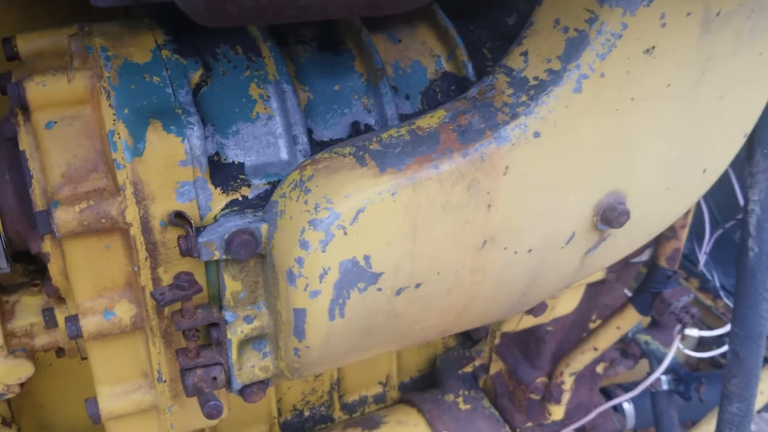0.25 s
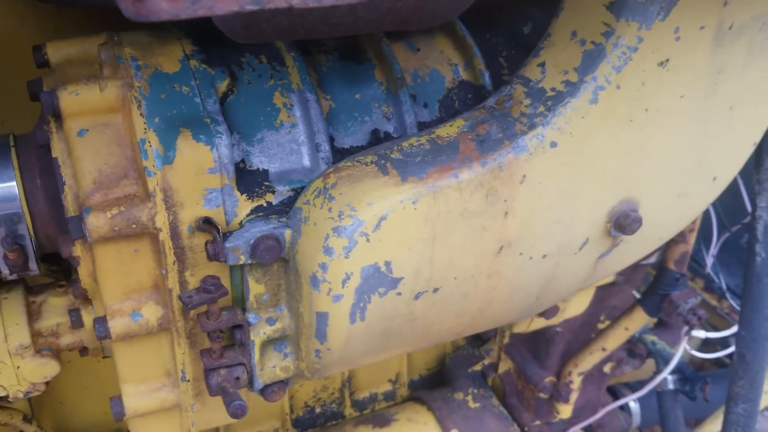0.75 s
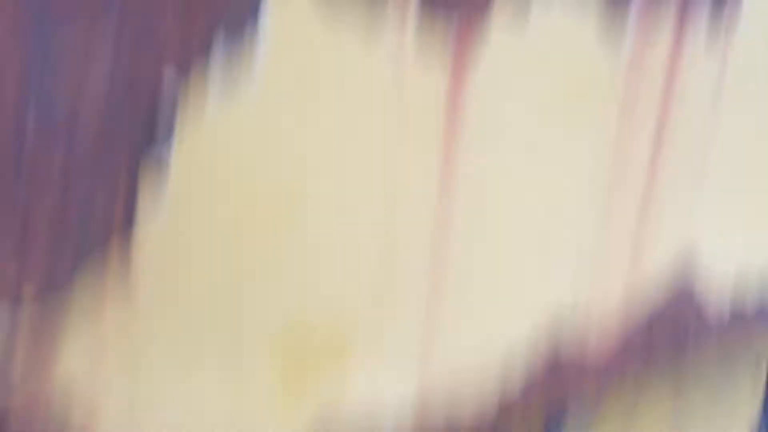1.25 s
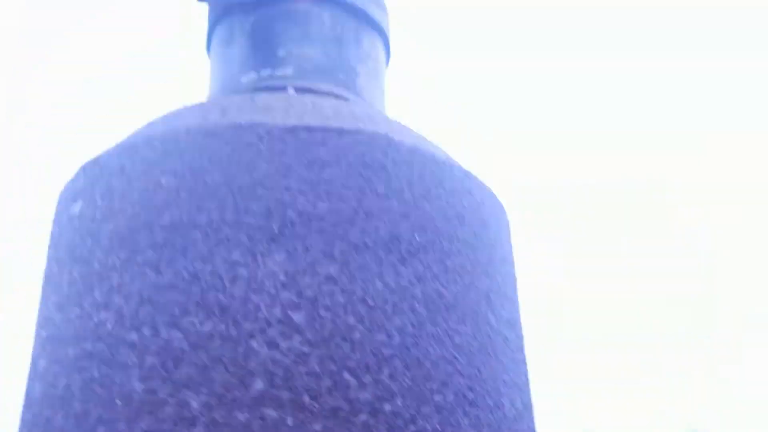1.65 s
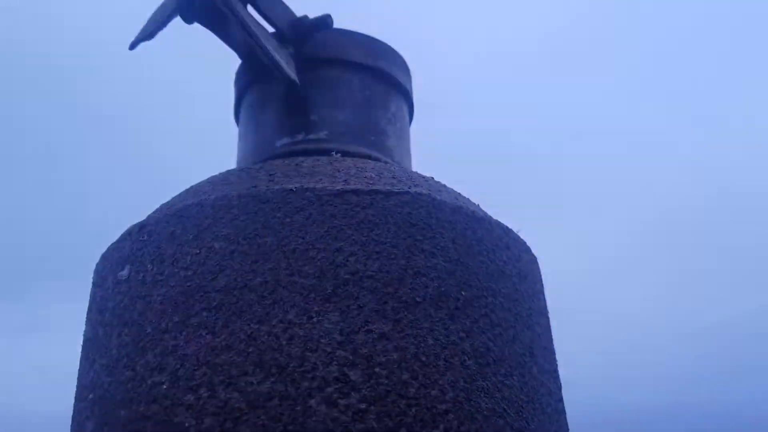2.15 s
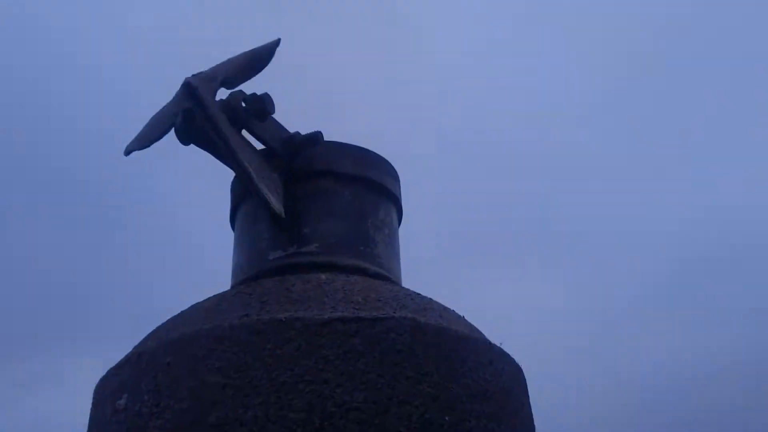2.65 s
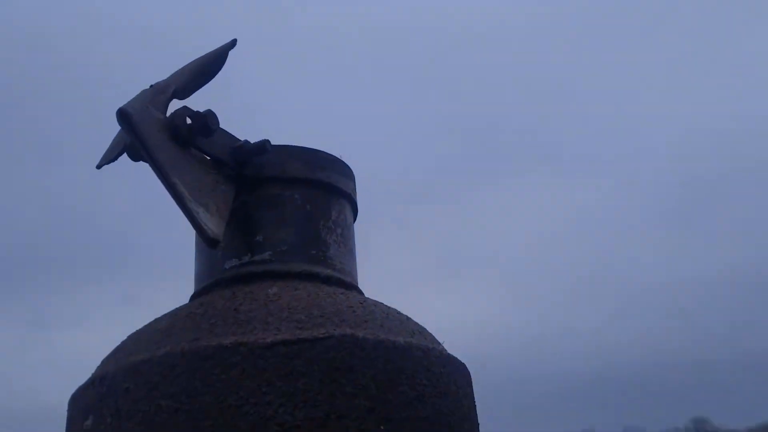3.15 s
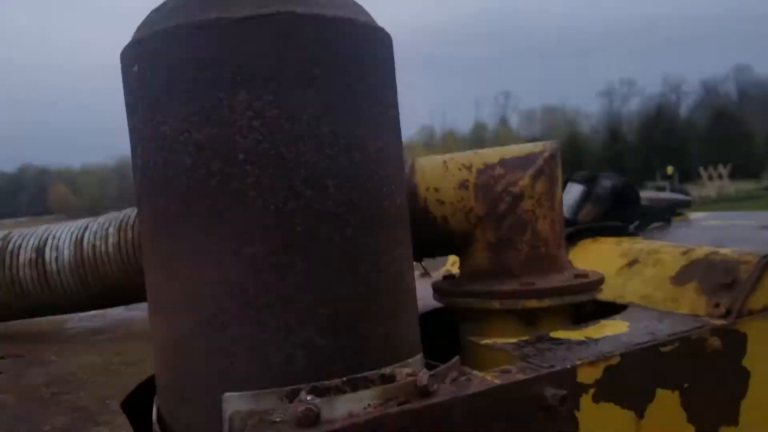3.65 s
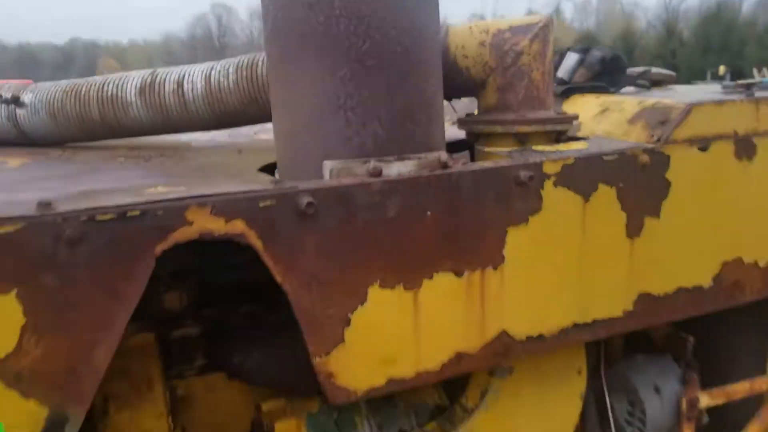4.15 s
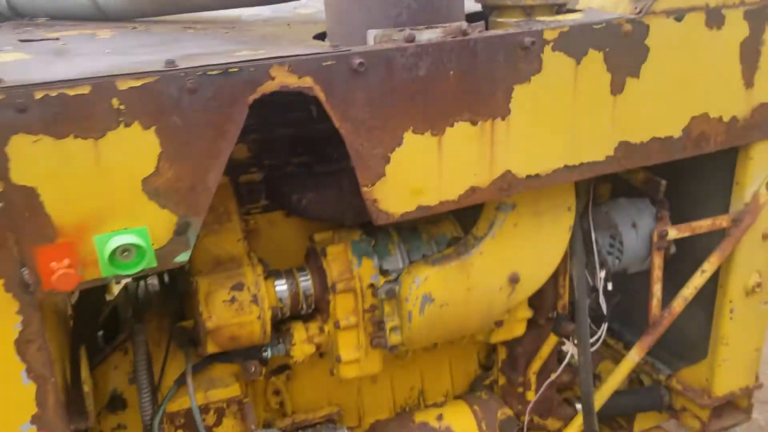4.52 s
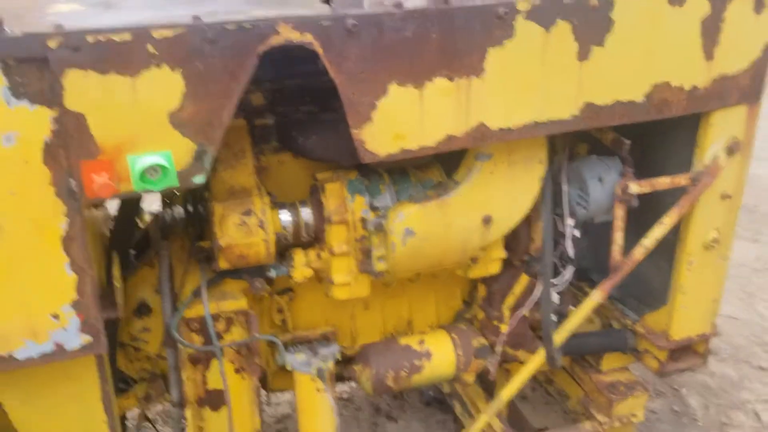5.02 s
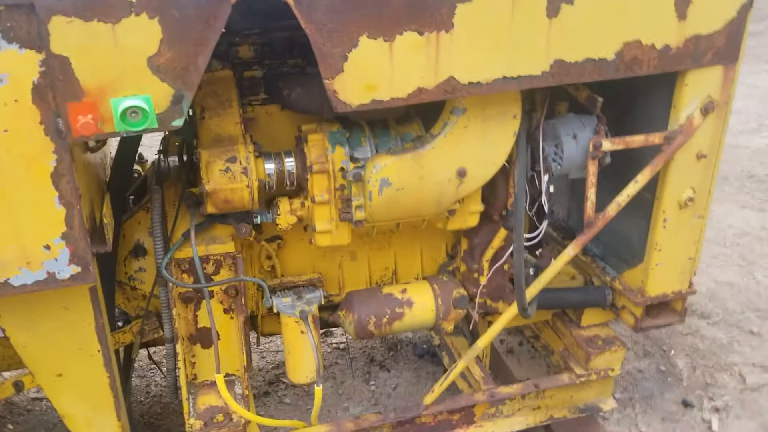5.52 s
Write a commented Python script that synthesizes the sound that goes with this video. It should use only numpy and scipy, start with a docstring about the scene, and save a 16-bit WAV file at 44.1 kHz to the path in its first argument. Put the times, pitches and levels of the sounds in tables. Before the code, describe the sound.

An old four-cylinder two-stroke diesel runs outdoors, heard in close, dry stereo. At 0 s it is already slowing from a fast rev: a buzzing exhaust drone and high gear whine glide down over dense metallic rattle beside the blower. From about 1.1 to 1.7 s the microphone moves to the exhaust stack; the whine recedes, and the low boom and a thin steady hiss come forward. At 1.8 s the throttle opens; pitch climbs to a peak near 2.5 s, with coarse, pulsing gas rasp and a breathy high whistle. Then the throttle closes, the rasp vanishes by 2.5 s, and the pitch slides down with softer clatter and gear whine. Between 3.6 and 4.7 s the microphone steps back. The hiss fades, and idle settles into a quick, loping beat of about fifty firings per second, with uneven knocks, slaps, ticks and panel rattle, until nearly 6 s.

```python
"""Outdoors, an old four-cylinder two-stroke diesel runs down to idle, is blipped once and settles again.
The microphone moves from beside the blower up to the exhaust stack, then steps back from the engine.
The stack booms in harmonics of the firing rate; noise struck once per firing knocks, slaps and ticks.
Blower and timing gears whine in step with the crank; under throttle, puffs of noise rasp and whistle."""
import sys
import numpy as np
from scipy import signal
from scipy.fft import rfft, irfft, next_fast_len
from scipy.io import wavfile
from scipy.ndimage import map_coordinates

SR = 44100
rng = np.random.default_rng(int(sys.argv[2]) if len(sys.argv) > 2 else 0)


def dump_mix(stems):
    """Bounce the given channels to the path in sys.argv[1] as a 16-bit WAV at rate SR."""
    frames = np.atleast_2d(stems).T  # one column per channel
    limited = np.clip(frames, -1, 1)  # hard clip at full scale
    pcm = np.round(limited * 32767).astype(np.int16)
    wavfile.write(sys.argv[1], SR, pcm)


N = 254889
T = np.arange(N) / SR
IDLE_HZ = 47  # firings per second at which the speed-dependent levels are stated


def undb(db):
    """Decibels to gain."""
    return 10 ** (np.asarray(db) / 20)


def unit(x):
    """Scale to rms 1."""
    return x / np.sqrt(np.mean(x ** 2))


def level_curve(table):
    """Gain, sample by sample, from a table of times and levels joined by straight lines in dB."""
    seconds, db = np.transpose(table)
    return undb(np.interp(T, seconds, db))


def colour(x, points):
    """Filter by (frequency [Hz], level [dB]) points joined on a log frequency axis."""
    size = next_fast_len(N + 4096, real=True)
    hz, db = np.transpose(points)
    freq = np.maximum(np.fft.rfftfreq(size, 1 / SR), 1)
    gain = undb(np.interp(np.log(freq), np.log(hz), db))
    return irfft(rfft(x, size) * gain, size)[..., :N]


def butter(x, hz, kind):
    """Second-order low- or high-pass."""
    return signal.sosfilt(signal.butter(2, hz, kind, fs=SR, output="sos"), x)


def ring(x, hz, width_hz):
    """One resonance, gain 1 at its centre."""
    return signal.lfilter(*signal.iirpeak(hz, hz / width_hz, fs=SR), x)


def noise():
    """Two unrelated white noises: mid and side."""
    return rng.standard_normal((2, N))


def wander(rate_hz):
    """Two smooth random signals of rms 1."""
    return unit(butter(noise(), rate_hz, "low"))


def breathy_tone(hz, width_hz):
    """A narrow band of noise around a moving pitch."""
    angle = 2 * np.pi * np.cumsum(hz) / SR
    return wander(width_hz / 2) * np.cos(angle) + wander(width_hz / 2) * np.sin(angle)


def late(x, seconds):
    """Delay by a fixed or moving time."""
    return map_coordinates(x, [(T - seconds) * SR], order=3, mode="nearest")


def throttle_envelope(attack_s, release_s):
    """The blip as attack, hold and release, 0 to 1."""
    press_s, let_go_s = 1.822, 2.4312
    rise = (T - press_s) / attack_s
    fall = 1 - (T - let_go_s) / release_s
    return np.clip(np.minimum(rise, fall), 0, 1)


def engine_speed():
    """Firings per second: torque and a sluggish governor pull, friction drags towards a floor."""
    start_hz, coast_floor_hz, coast_s = 87.1, 41.42, .6856
    pull_hz_per_s = 134.96  # at full throttle
    governor_hz, governor_share_per_hz, governor_lag_s = 47.58, .164, .678
    step_s = .01
    times = np.arange(0, T[-1] + step_s, step_s)
    torques = np.interp(times, T, throttle_envelope(attack_s=.5046, release_s=.3767))
    hz, fuel, speeds = start_hz, 0, []
    for torque in torques:
        speeds.append(hz)
        wanted_fuel = governor_share_per_hz * max(governor_hz - hz, 0)
        fuel += step_s * (wanted_fuel - fuel) / governor_lag_s
        hz += step_s * (pull_hz_per_s * (torque + fuel) - (hz - coast_floor_hz) / coast_s)
    return np.interp(T, times, speeds)


def coasting(hz):
    """How far the engine runs down without fuel, 0 to 1, judged by how fast it slows."""
    full_coast_hz_per_s = 16
    return np.clip(-np.gradient(hz) * SR / full_coast_hz_per_s, 0, 1)


def octaves_above_idle(hz):
    """Engine speed in octaves above idle."""
    return np.log2(hz / IDLE_HZ)


def by_speed(hz, db_per_octave, coasting_db):
    """Change of level in dB with speed and with coasting."""
    return db_per_octave * octaves_above_idle(hz) + coasting_db * coasting(hz)


def standpoint_shares():
    """How much of each standpoint is heard as the microphone moves: blower, stack, stepped back."""
    left_blower = np.interp(T, [1.1, 1.74], [0, 1])
    stepped_back = np.interp(T, [3.64, 4.66], [0, 1])
    return np.array([1 - left_blower, left_blower - stepped_back, stepped_back])


def blows(firings, angle, cylinder_db, decay_s):
    """Envelope of one blow per firing at a given share of its interval; cylinders differ in strength."""
    count = np.floor(firings - angle).astype(int) + 4  # +4 keeps the index positive
    age_s = T - T[np.searchsorted(count, count)]
    scatter_db = 1.1 * rng.standard_normal(count.max() + 1)
    return undb(cylinder_db[count % 4] + scatter_db[count]) * np.exp(-age_s / decay_s)


def rattle(firings, alike):
    """Dense metal contacts as noise of which a share repeats on every turn of the crank."""
    count = np.floor(firings).astype(int)
    age = np.arange(N) - np.searchsorted(count, count)  # samples since the firing
    pattern = rng.standard_normal((2, 4, 2048))
    return np.sqrt(alike) * pattern[:, count % 4, age] + np.sqrt(1 - alike) * noise()


# The four cylinders in firing order: (exhaust strength [dB], combustion knock [dB],
# piston slap [dB], injector tick [dB])
CYLINDER_STRENGTHS = [(-.8, -3, -4, -3), (.6, -3, 3, -1), (2.2, 5, 0, 0), (-1.6, -4, -10, 3)]
# What the muffler passes: (frequency [Hz], level [dB])
MUFFLER_RESPONSE = [(46, -24), (62, -8), (72, 0.5), (94, 0.5), (122, 2.5), (152, 4.5), (168, -1.5),
                    (186, -6), (215, -19.5), (276, -4)]
# Overall level of the three lowest exhaust harmonics: (time [s], level [dB])
BOOM_LEVELS = [(0.03, -13.5), (0.27, -11), (0.81, -13), (1.19, -9), (1.91, -7), (2.25, -10.5), (2.53, -8.5),
               (2.79, -15), (3.64, -14.5), (3.94, -11), (5.26, -12), (5.72, -12)]


def muffled_boom(firings, hz, throttle, third_db):
    """The muffler shapes the three lowest exhaust harmonics; unequal cylinders make them lope."""
    strength_db = signal.resample(np.array(CYLINDER_STRENGTHS)[:, 0], 64)  # smooth over one turn
    lope_db = np.interp(firings / 4 % 1, np.arange(64) / 64, strength_db, period=1)
    # the lope is deeper at low speed, and deepens once more late on
    lope_depth = np.interp(T, [3.9, 4.6], [.3, .9]) * IDLE_HZ / hz
    muffler_hz, muffler_db = np.transpose(MUFFLER_RESPONSE)
    muffling = 1 - .34 * throttle  # the blast partly overrides the muffler
    gains = []
    for k, extra_db in enumerate((0, 0, third_db), 1):
        passed_db = np.interp(np.log(k * hz), np.log(muffler_hz), muffler_db)
        gains.append(undb(passed_db * muffling + extra_db))
    gains = np.array(gains)
    gains = gains / np.linalg.norm(gains, axis=0) * level_curve(BOOM_LEVELS)
    angle = 2 * np.pi * (firings - .04)
    # the lowest tones are advanced most in phase
    low = sum(gain * np.cos(k * angle + 1.4 / k ** 2) for k, gain in enumerate(gains, 1))
    return low * undb(lope_db * lope_depth + .075 * wander(37)[0])


# Resonances of the exhaust system: (frequency [Hz], width [Hz], level [dB])
PIPE_RESONANCES = [(180.7, 13.4, -35.5), (223.6, 28, -40), (405, 25, -36.5), (565, 13, -39)]


def pipe_tones(firings, throttle):
    """Uneven harmonics 4 to 7 swell through the pipe resonances; throttle sharpens the pulses."""
    angle = 2 * np.pi * (firings - .04)
    uneven = 1 + .55 * np.cos(angle / 4) + .38 * wander(17)[0]
    upper = sum(np.cos(k * angle) for k in range(4, 8)) * uneven
    pipe = sum(undb(db) * ring(upper, centre, width) for centre, width, db in PIPE_RESONANCES)
    edge = undb(-42) * throttle * upper
    return pipe + edge


def exhaust_boom(firings, hz, throttle, third_db):
    """The stack's whole pitched voice: muffled boom and pipe tones."""
    voice = muffled_boom(firings, hz, throttle, third_db) + pipe_tones(firings, throttle)
    return np.sqrt(2) * voice


# Colour of the machinery beside the blower: (frequency [Hz], level [dB])
BLOWER_COLOUR = [(150, -46), (260, -9), (336, -10), (420, 0), (542, -12), (640, -18.5), (764, -14.5),
                 (1020, -9), (1390, -23), (1990, -17.5), (2530, -24.5), (3950, -28.5), (5000, -35),
                 (7300, -40.5), (15500, -43.5)]
# Colour of the machinery by the stack: (frequency [Hz], level [dB])
STACK_COLOUR = [(150, 2), (260, -8.5), (413, 3), (561, -4), (777, -8.5), (1000, -4.5), (1280, -16),
                (1800, -18.5), (2490, -19), (3050, -25), (4080, -26), (5010, -29.5), (8230, -38.5),
                (12000, -34.5), (15500, -39)]
# Colour of the machinery stepped back from the engine: (frequency [Hz], level [dB])
STEPPED_BACK_COLOUR = [(150, -40), (260, -1.5), (400, 6), (500, -6.5), (601, 4.5), (700, -7.5), (987, 4.5),
                       (1150, -7), (1450, -10), (1900, -10), (2660, -17), (4220, -18.5), (4840, -24),
                       (9600, -32), (15500, -36)]


def clatter(firings, knock, tick, clatter_db):
    """Knocks and injector ticks over a steady rattle, coloured by where the listener stands."""
    steady = rattle(firings, alike=.82)
    knocks = rattle(firings, alike=.7) * knock
    body = butter(.91 * steady + 1.03 * knocks, 2850, "low")
    top = butter(.87 * noise() + .21 * knocks + 1.37 * noise() * tick, 2430, "high")
    top = top * undb(.9 * wander(8.7)[0])  # the treble flickers
    places = (BLOWER_COLOUR, STACK_COLOUR, STEPPED_BACK_COLOUR)
    heard = sum(share * unit(colour(body + top, place))
                for share, place in zip(standpoint_shares(), places))
    return heard * undb(clatter_db + .5 * wander(9)[0])


def contact(firings, blow):
    """A blow as one hard impact and a short rattle."""
    impact = unit(np.maximum(np.diff(blow, prepend=blow[0]), 0))
    impact_mid_only = np.array([impact, np.zeros(N)])
    return unit(rattle(firings, alike=.7) * blow) + .77 * impact_mid_only


# Ringing panels: (struck by [blow name], frequency [Hz], width [Hz], level beside the blower [dB],
# level by the stack [dB], level stepped back [dB])
PANEL_MODES = [("slap", 778, 97, -42, -59, -36), ("slap", 1015, 37, -61, -30.5, -41),
               ("knock", 1700, 270, -60, -39, -57.5), ("knock", 2370, 1200, -58, -48.5, -72),
               ("knock", 4080, 76, -41, -58, -48)]


def panels(firings, hz, knock, slap):
    """Sheet metal resonances struck by knock or slap; without fuel only speed shakes them."""
    struck = {"knock": knock, "slap": slap}
    shares = standpoint_shares()
    ringing = 0
    for blow, centre, width, *place_db in PANEL_MODES:
        mode = unit(ring(contact(firings, struck[blow]), centre, width))
        ringing = ringing + undb(place_db) @ shares * mode
    return ringing * undb(coasting(hz) * (-20.5 + 20.5 * octaves_above_idle(hz)))


# Colour of the low chassis and muffler shudder: (frequency [Hz], level [dB])
SHUDDER_COLOUR = [(15, -18), (35, -18), (70, 4), (120, 8), (185, 7), (260, -11), (400, -41)]


def shudder(firings):
    """Low shudder of chassis and muffler, partly repeating with each turn of the crank."""
    return undb(-27) * unit(colour(rattle(firings, alike=.43), SHUDDER_COLOUR))


def machinery(firings, hz, clatter_db):
    """Combustion knock, piston slap and injector ticks drive the clatter and the panels over a shudder."""
    _, knock_db, slap_db, tick_db = np.transpose(CYLINDER_STRENGTHS)
    bite = (IDLE_HZ / hz) ** 1.1  # single blows stand out at idle and merge at speed
    knock = bite * blows(firings, angle=.5, cylinder_db=knock_db, decay_s=.005)
    slap = bite * blows(firings, angle=.7, cylinder_db=slap_db, decay_s=.005)
    tick = bite * blows(firings, angle=.64, cylinder_db=tick_db, decay_s=.006)
    rattling = clatter(firings, knock, tick, clatter_db)
    return rattling + panels(firings, hz, knock, slap) + shudder(firings)


# Colour of the exhaust rasp: (frequency [Hz], level [dB])
RASP_SPECTRUM = [(150, -2.5), (260, 4.5), (303, -10), (385, 1), (420, -9), (542, -2), (713, -10),
                 (1000, 2.5), (1410, -11.5), (2020, -7.5), (2750, -16.5), (4450, -20.5), (5370, -19.5),
                 (6370, -30), (15500, -38)]


def rasp(firings, puff, heard_flow):
    """Turbulent gas as crank-locked noise, swelling with each exhaust puff."""
    turbulence = rattle(firings, alike=.88) * (.55 + puff)
    return undb(-17.5) * heard_flow * unit(colour(turbulence, RASP_SPECTRUM))


def whistle(hz, puff, flow, heard_flow):
    """A breathy tone in spurts rises with flow, more so at speed, and its level saturates early."""
    pitch_hz = 4190 + 1060 * flow * (hz / IDLE_HZ) ** .55
    flutter = 1 + .025 * wander(30)[0]
    spurts = butter(.1 + puff, 300, "low")
    tone = unit(breathy_tone(pitch_hz * flutter, width_hz=380) * spurts)
    return undb(-34.5) * heard_flow ** .54 * tone


def speed_hiss(hz, flow):
    """A thin flickering noise band whose pitch and level follow the speed; gas flow replaces it."""
    band = breathy_tone(10200 * (hz / IDLE_HZ) ** .65, width_hz=1200)
    band = band * undb(-55 + 11 * octaves_above_idle(hz)) * (1 - flow)
    flicker = undb(2 * wander(4.6)[0])
    nearness = np.maximum(standpoint_shares()[1], .3)
    return band * flicker * nearness * (.38 + .55 * coasting(hz))


# How squarely the stack's mouth faces the microphone: (time [s], level [dB])
MOUTH_FACING = [(1.2, -10), (1.6, -1.5), (3.15, 2.5), (3.55, -3), (3.8, -21)]


def mouth_hiss():
    """A narrow hiss of fixed pitch at the mouth of the stack, flickering, louder when it faces us."""
    band = breathy_tone(np.full(N, 8300), width_hz=1100)
    return undb(-51) * band * undb(1.3 * wander(6.8)[0]) * level_curve(MOUTH_FACING)


def gas(firings, hz, flow):
    """A puff of turbulent gas per firing drives rasp and whistle; two thin hisses lie over them."""
    exhaust_db = np.array(CYLINDER_STRENGTHS)[:, 0]
    puff = blows(firings, angle=.42, cylinder_db=exhaust_db, decay_s=.006)
    # by the stack a trickle of flow remains unless the engine coasts
    trickle = .11 * standpoint_shares()[1] * (1 - coasting(hz))
    heard_flow = np.maximum(flow, trickle)
    driven = rasp(firings, puff, heard_flow) + whistle(hz, puff, flow, heard_flow)
    return driven + speed_hiss(hz, flow) + mouth_hiss()


def blower(firings, tone_db, octave_db):
    """Gear whine at 78 teeth a turn, roughened by backlash; the moving microphone shifts its stereo lag."""
    mesh = 2 * np.pi * firings * 78 / 4  # four firings a turn
    mesh = mesh + .5 * np.sin(np.pi * firings / 2) + .35 * wander(35)[0]
    backlash = 1 + .5 * wander(60)[0]
    tone = undb(tone_db) * np.sin(mesh) * backlash
    octave = undb(octave_db) * np.sin(2 * mesh) * backlash * (1 + .54 * wander(8)[0])
    lag_s = np.interp(T, [.1, .5, 1, 1.6], [.00049, .00029, .00025, .00015])
    left_db = np.interp(T, [1.2, 1.6], [0, -5])
    return np.sqrt(2) * (np.array([undb(left_db) * tone, late(tone, lag_s)]) + octave)


def timing_gears(firings):
    """A 47-tooth gear tone, pulsed by each firing, sings out at a resonance of the cover."""
    mesh = 2 * np.pi * firings * 47 / 4
    pulsed = np.sin(mesh + .6 * wander(25)[0]) * (1 + .6 * np.cos(2 * np.pi * firings))
    place_gain = undb(np.array([-34, -24, -26]) @ standpoint_shares())
    return place_gain * ring(ring(pulsed, 994, 150), 994, 150)


def hood_drone(firings):
    """A sheet of the hood hums as the 23rd and 24th crank orders pass its resonance."""
    crank = 2 * np.pi * firings / 4
    shake = np.sin(23 * crank + .3 * wander(15)[0]) + .5 * np.sin(24 * crank)
    place_gain = undb(np.array([-18.5, -22.5, -22.5]) @ standpoint_shares())
    return place_gain * ring(ring(shake, 403, 32), 403, 32)


# Stereo picture: (frequency [Hz], side minus mid [dB], left minus right [dB])
STEREO_PICTURE = [(100, -22, 2), (300, -17, 2), (484, -10, 2), (1050, -14.5, 2.5), (1550, 3.5, -2),
                  (2330, -1, -4.5), (3600, 1, -0.5), (5260, 1, 4), (9500, 2, 5), (15000, -2, 6.5)]


def stereo(mid, side):
    """Left and right from mid and side: bass alike, treble diffuse, the right slightly late."""
    band_hz, side_db, balance_db = np.transpose(STEREO_PICTURE)
    side = colour(side, np.c_[band_hz, side_db])
    left = colour(mid + side, np.c_[band_hz, balance_db / 2])
    right = colour(mid - side, np.c_[band_hz, -balance_db / 2])
    return np.array([left, late(right, .00015)])


# Balance beside the blower, by the stack, stepped back: (clatter [dB], third exhaust harmonic [dB],
# gear whine [dB], octave of the whine [dB])
STANDPOINT_LEVELS = [(-22.5, -6.5, -32.5, -37.5), (-25.5, -12, -42.5, -44.5), (-27, -2, -42, -47)]


def scene():
    """All crank-driven sources share one engine speed; levels follow speed, throttle and standpoint."""
    hz = engine_speed()
    firings = 3.85 + np.cumsum(hz) / SR
    flow = throttle_envelope(attack_s=.23, release_s=.25)
    shares = standpoint_shares()
    clatter_db, third_db, whine_db, octave_db = np.transpose(STANDPOINT_LEVELS) @ shares
    clatter_db = clatter_db + by_speed(hz, db_per_octave=4.33, coasting_db=-4.5)
    clatter_db = clatter_db - 3 * flow  # gears under load rattle less
    whine_db = whine_db + by_speed(hz, db_per_octave=2.9, coasting_db=2.87)
    whine_db = whine_db + 10 * shares[1] * octaves_above_idle(hz)  # grows faster by the stack
    octave_db = octave_db + by_speed(hz, db_per_octave=-10, coasting_db=-1.4)
    boom = exhaust_boom(firings, hz, flow, third_db)
    mid, side = machinery(firings, hz, clatter_db) + gas(firings, hz, flow)
    mid = mid + boom + timing_gears(firings) + hood_drone(firings)
    mid = mid * np.clip(np.minimum(T, T[-1] - T) / .006, 0, 1)  # 6 ms fade at both ends
    return stereo(mid, side) + blower(firings, whine_db, octave_db)


def record(dry):
    """Peaks near full scale are rounded and the extreme treble is cut."""
    limited = dry / (1 + dry ** 12) ** (1 / 12)
    top_hz = 15700
    return signal.sosfilt(signal.ellip(10, .2, 80, top_hz, fs=SR, output="sos"), limited)


dry = scene()
out = record(dry)
dump_mix(out)
```